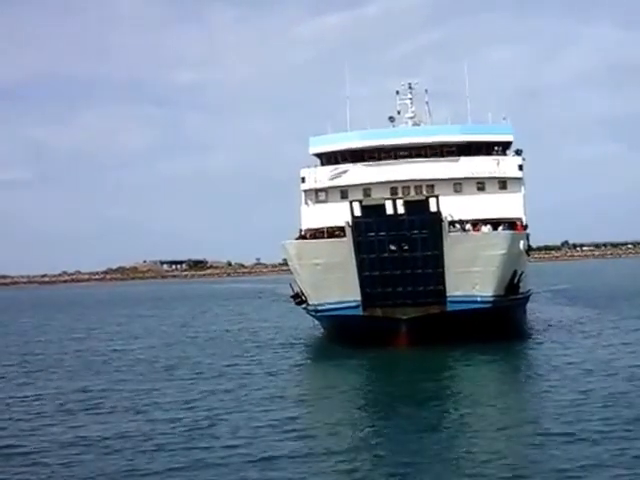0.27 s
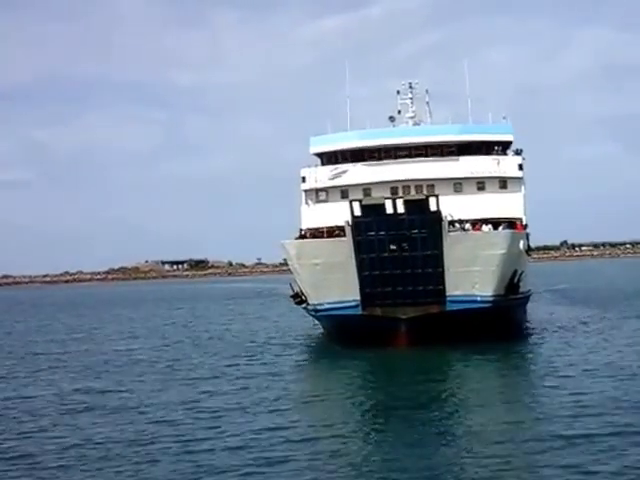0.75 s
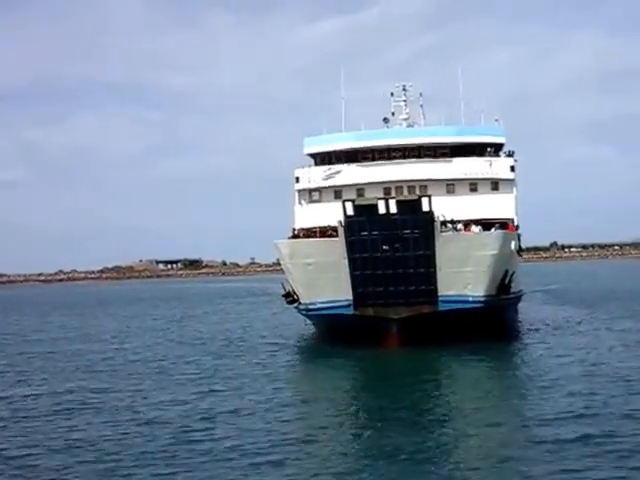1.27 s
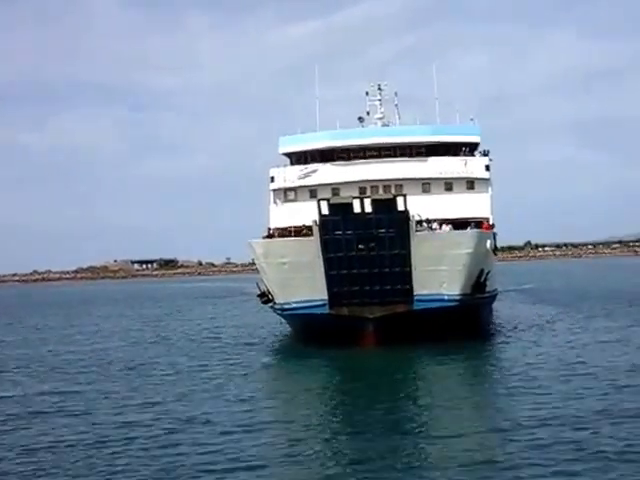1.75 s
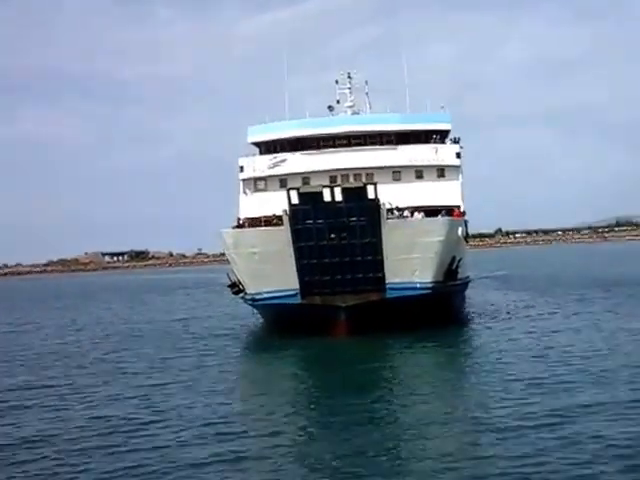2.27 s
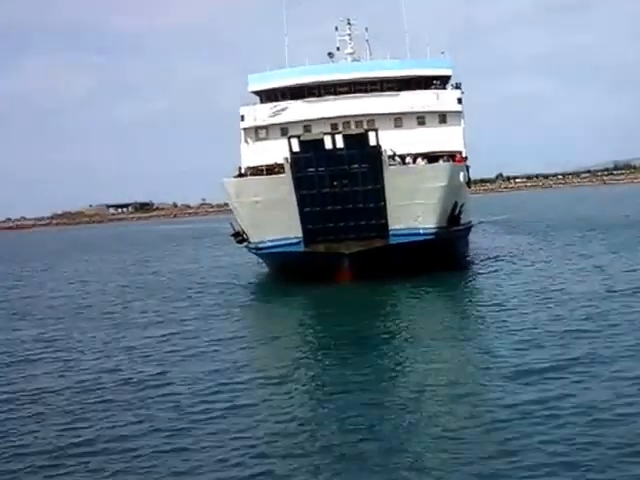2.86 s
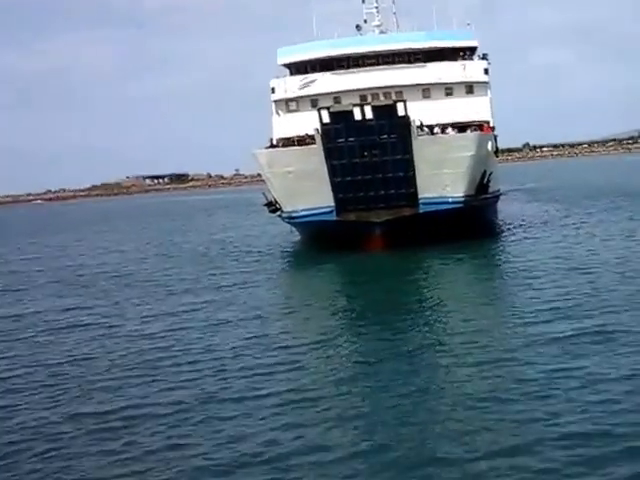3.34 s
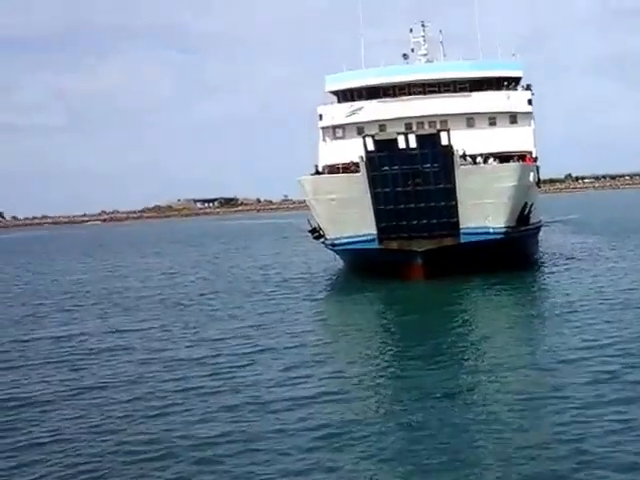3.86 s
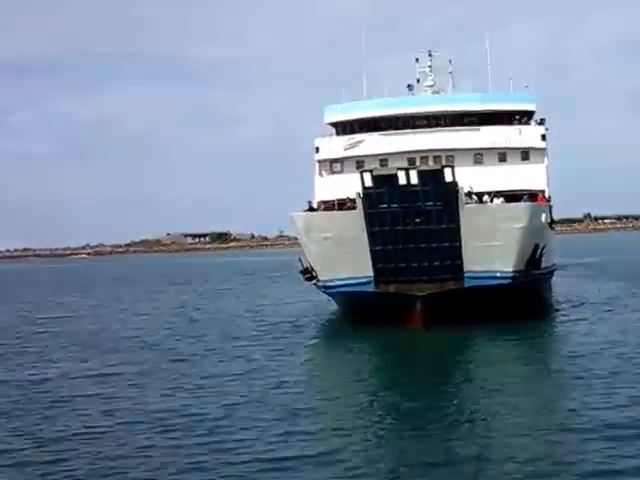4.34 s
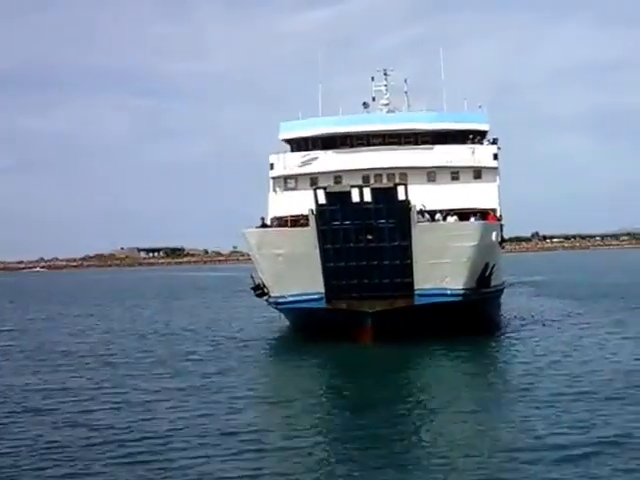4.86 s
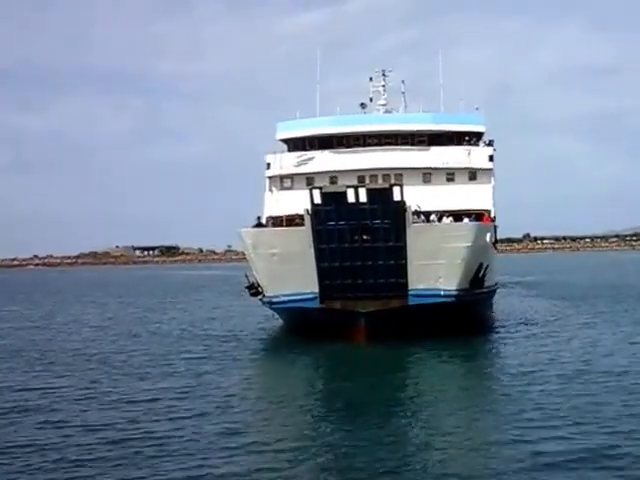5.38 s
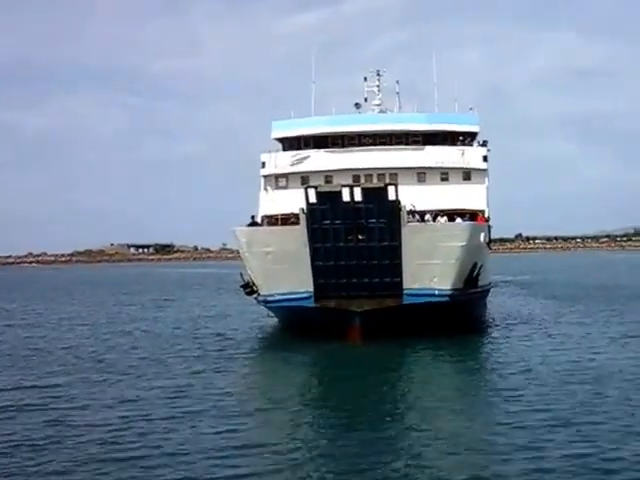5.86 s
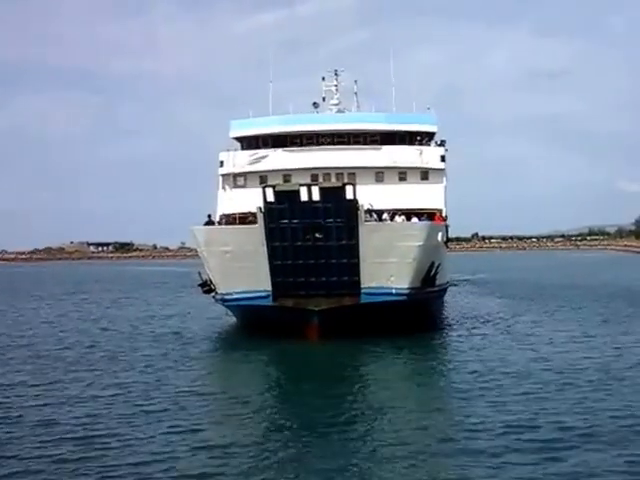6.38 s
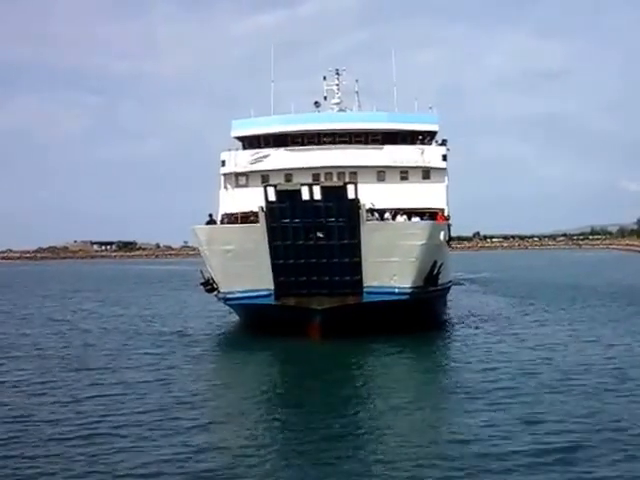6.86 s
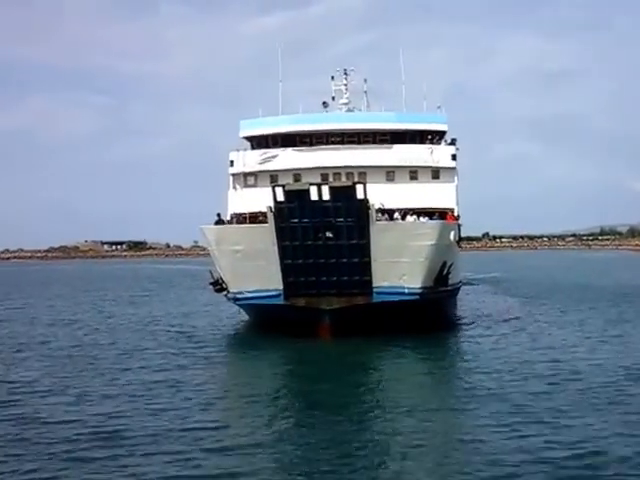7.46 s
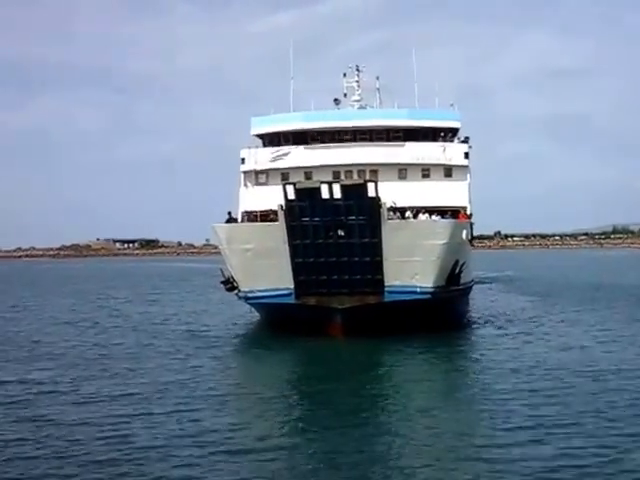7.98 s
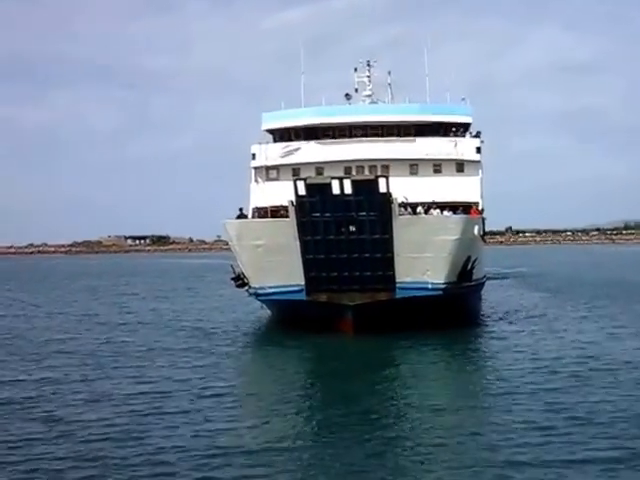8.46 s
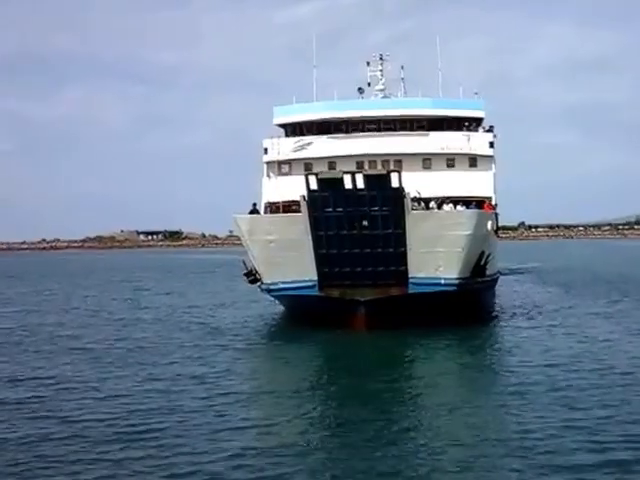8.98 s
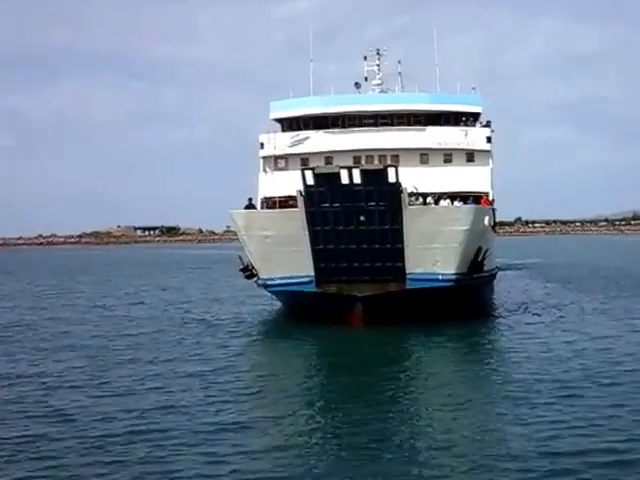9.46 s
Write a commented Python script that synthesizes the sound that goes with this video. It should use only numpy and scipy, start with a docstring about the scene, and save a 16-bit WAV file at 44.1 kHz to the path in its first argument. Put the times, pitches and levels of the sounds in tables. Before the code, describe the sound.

Two steady, blaring ship horn blasts at a harbour, with rumbling wind bursts between and after, soft water hiss and a thin high whistle.

```python
"""A harbour: a ferry's air horn, already sounding at the start, gives two long, bright blasts. The horn is a
sum of harmonics of a pulsed air stream; decaying noise makes the echo of water and quay. Wind, noise in three
bands and sharp pressure jolts, buffets the microphone in gusts, which come through loudest between and after
the blasts. From the second blast on, a thin, wavering whistle of noisy harmonics rises over a soft hiss of
water, which is shaped noise; a small click falls near the end."""
import sys
import numpy as np
from scipy import signal
from scipy.fft import rfft, irfft, next_fast_len
from scipy.io import wavfile

SR = 44100
rng = np.random.default_rng(int(sys.argv[2]) if len(sys.argv) > 2 else 0)


def transcribe(signal):
    """Save signal, clipped to [-1, 1], as a 16-bit WAV file at the path in sys.argv[1]."""
    frames = np.atleast_2d(signal).T
    limited = np.clip(frames, -1, 1)
    pcm = np.round(limited * 32767).astype(np.int16)
    wavfile.write(sys.argv[1], SR, pcm)


N = 429093
TIME = np.arange(N) / SR


def amp(db):
    """Level law: decibels to amplitude gain."""
    return 10 ** (np.asarray(db) / 20)


def unit(x):
    """Normalisation: a signal scaled to rms 1."""
    return x / np.sqrt(np.mean(x ** 2) + 1e-20)


def along(points, hz):
    """Logarithmic frequency scale: (freq_hz, value) points interpolated at hz."""
    f, v = np.transpose(points)
    return np.interp(np.log(hz + 1), np.log(f + 1), v)


def curves(rows, t=TIME):
    """Linear interpolation: each column after the time column, read at the times t."""
    s, *columns = np.transpose(rows)
    return [np.interp(t, s, column) for column in columns]


def wobble(rate, t=TIME):
    """Band-limited randomness: a smooth curve through rate random knots a second, rms about 1."""
    knots = rng.standard_normal(int(N * rate / SR) + 16)
    fine = signal.resample_poly(knots, 8, 1)
    return np.interp(t * rate * 8 + 32, np.arange(len(fine)), fine)


def ripples(count, rate, t, alike):
    """Correlated fluctuation: one random curve per partial, each resembling its neighbour's."""
    rows = [wobble(rate, t) for _ in range(count)]
    return signal.lfilter([np.sqrt(1 - alike ** 2)], [1, -alike], rows, axis=0)


def filtered(x, response):
    """Linear filtering: the spectrum of x times a response of frequency."""
    m = next_fast_len(len(x) + SR // 4)
    return irfft(rfft(x, m) * response(np.fft.rfftfreq(m, 1 / SR)), m)[:len(x)]


def noise(spectrum):
    """Spectral shaping: white noise coloured by (freq_hz, level_db), rms 1."""
    return unit(filtered(rng.standard_normal(N), lambda hz: amp(along(spectrum, hz))))


def below(hz, edge_hz, order):
    """Low-pass law: gain that rolls off smoothly above edge_hz."""
    return 1 / (1 + (hz / edge_hz) ** order)


# valve times of each blast: opens_s, shuts_s
BLAST_VALVES = [(-.2, 2.118), (3.453, 7.675)]
# slow level of each blast in four bands, before the horn's trim:
# time_s, lowest_partials_db (first to third), fourth_partial_db, middle_db, blare_db
BAND_LEVELS = [
    [(0.02, -19.5, -28, -22, -20.5), (0.32, -22, -33.5, -23.5, -22), (0.84, -22.5, -37, -22.5, -20.5),
     (1.31, -21.5, -32, -21, -20.5), (1.45, -23, -33.5, -21.5, -20), (1.81, -20.5, -33, -19, -21.5),
     (2.09, -21, -30, -20.5, -21.5)],
    [(3.52, -28.5, -28.5, -24.5, -18.5), (3.9, -25, -27, -24, -22), (4.19, -28.5, -23.5, -23, -20.5),
     (4.39, -24.5, -24.5, -22, -20.5), (4.73, -27.5, -23, -22.5, -18), (5.3, -26, -34.5, -25, -22.5),
     (6.03, -26, -26, -21.5, -20.5), (6.51, -25.5, -28.5, -22.5, -20), (6.76, -23.5, -27.5, -20.5, -21.5),
     (7.14, -24.5, -28, -21.5, -18.5), (7.23, -27.5, -29, -22, -20), (7.65, -23, -34.5, -20, -22)],
]
# relative partials of each blast, balanced within each band: multiple, level_db
FIRST_PARTIALS = [(1, -21), (2, -17.5), (3, -1), (4, -10.5), (5, -0.5), (6, -0.5), (7, -15.5), (8, -5),
                  (9, -9), (10, -18), (11, -19.5), (12, -12), (13, -16.5), (14, -12.5), (15, -13.5),
                  (16, -14.5), (17, -8), (18, -7.5), (19, -16.5), (20, -7), (21, -5.5), (22, -6)]
SECOND_PARTIALS = [(1, -12.5), (2, -18), (3, 1), (4, -1.5), (5, 1.5), (6, 5), (7, -4.5), (8, -3), (9, -5),
                   (10, -10.5), (11, -11), (12, -17.5), (13, -8), (14, -6), (15, -11), (16, -10), (17, -8),
                   (18, -10), (19, -3), (20, -8.5), (21, 0), (22, -1)]
# the blaring top of the horn, against the last listed partial: freq_hz, level_db
BLARE_SPECTRUM = [(6250, 1), (6550, 2.5), (6850, -2.5), (7400, -8), (8150, -15.5), (9000, -24),
                  (10300, -30.5), (11300, -35.5), (14000, -39)]
PITCH_HZ, CREEP_HZ_PER_S = 270.64, 0.27  # the diaphragm's pitch creeps up the whole time
SHARP_HZ, SETTLE_S = 4.18, 0.0503  # each blast starts sharp and settles with this time constant
# quick beating, full from the tenth partial up, calms down through a blast
FLICKER_START_DB, FLICKER_END_DB = 2.5, 0.67


def blast(valve, band_levels, partials, fade_db=3, rise_s=0.0087, linger_s=0.052, linger_db=-6):
    """Harmonics of a pulsed flow: a diaphragm chops the air; partials fade partly with their neighbours."""
    opens, shuts = valve
    on = (TIME > opens) & (TIME < shuts + .3)
    t = TIME[on]
    pitch = PITCH_HZ + CREEP_HZ_PER_S * t + SHARP_HZ * np.exp(-(t - opens) / SETTLE_S)
    jitter = 0.00048 * wobble(40, t) + 0.000331 * wobble(4, t)
    phase = 2 * np.pi * np.cumsum(pitch * (1 + jitter)) / SR

    multiples, levels = np.transpose(partials)
    k = np.arange(1, 52)
    hz = k * PITCH_HZ
    blare = along(BLARE_SPECTRUM, hz) + levels[-1]
    level = np.where(k <= len(multiples), np.interp(k, multiples, levels), blare)
    band_of = np.digitize(hz, [950, 1200, 4450])

    flicker_db = np.interp(t, valve, [FLICKER_START_DB, FLICKER_END_DB])
    fades = ripples(len(k), 1.7, t, alike=0.43)
    beats = ripples(len(k), 26, t, alike=0.51)
    offsets = rng.standard_normal(len(k))
    # when the valve shuts the direct sound drops at once; what the ship's front reflects lingers
    after = np.maximum(t - shuts, 0)
    release = np.maximum(np.exp(-after / .025), amp(linger_db) * np.exp(-after / linger_s))

    bands, power = np.zeros((4, len(t))), np.zeros((4, len(t)))
    for n, b, db, fade, beat, offset in zip(k, band_of, level, fades, beats, offsets):
        exposure = min(n / 10, 1) ** 2  # short waves are scattered more by turbulence
        gain = amp(db + exposure * fade_db * (1.5 - 1.8 * np.abs(fade)))  # narrow crests, broad dips
        # the pulse sharpens as the pressure builds: high partials enter later
        attack = np.clip((t - opens - 0.00067 * min(n, 30)) / rise_s, 0, 1)
        # the flare smears each pulse; reflections and moving air shift the arrival of each partial
        lag = .04 * n * n + min(n / 6, 1) * .7 * offset + exposure * .4 * fade
        flicker = amp(exposure * flicker_db * beat)
        bands[b] -= gain * flicker * attack * np.cos(n * phase - lag)
        power[b] += gain ** 2 / 2
    out = np.zeros(N)
    out[on] = release * np.sum(amp(curves(band_levels, t)) * bands / np.sqrt(power), axis=0)
    return out


# reverberation time: freq_hz, t60_s
HARBOUR_DECAY = [(300, 0.089), (1200, 0.16), (3000, 0.77), (6000, 0.43), (12000, 0.084)]
# echo against the direct sound: freq_hz, level_db
ECHO_SPECTRUM = [(800, -22), (1700, -17), (3000, -16), (6000, -10.5), (12000, 0)]


def harbour(x):
    """Diffuse reflection: hull, quay and water answer with a short, bright tail, 25 ms late."""
    hz, t, z = signal.stft(rng.standard_normal(SR), SR, nperseg=256)
    decay = amp(-60 * t / along(HARBOUR_DECAY, hz)[:, None])
    tail = signal.istft(z * decay, SR, nperseg=256)[1]
    tail = np.pad(tail, (round(.025 * SR), 0))
    answer = signal.fftconvolve(x, tail / np.linalg.norm(tail))[:N]
    return filtered(answer, lambda hz: amp(along(ECHO_SPECTRUM, hz)))


# hiss before its random swing: time_s, level_db
HISS_LEVEL = [(0, -44), (2.5, -48), (2.9, -42.5), (5.5, -47.5), (8.5, -40.5), (9.1, -45), (9.45, -40.5),
              (9.73, -44.5)]
# relative noise spectrum of water, also used by the click: freq_hz, level_db (per Hz)
WATER_SPECTRUM = [(300, -21), (2000, -1), (3100, -6), (4500, -1.5), (5600, 0), (6650, 5), (7800, -8),
                  (9500, -13.5), (11500, -19), (14000, -25)]


def water():
    """Broadband noise radiation: ripples and air make a soft hiss."""
    return amp(curves(HISS_LEVEL)[0] + 2.1 * wobble(18)) * noise(WATER_SPECTRUM)


BREEZE_DB, BREEZE_BRIGHT_DB = -35.5, -4.5  # rumble and brightness of the wind between gusts
GUST_ATTACK_S, GUST_RELEASE_S = 0.01, 0.075
GUST_SWELL_DB = 0.5  # a gust gains this much over its length
# gusts, before lumps and trims; brightness is flutter against rumble:
# start_s, length_s, rumble_db, brightness_db
WIND_GUSTS = [(0.185, 0.3, -26.5, 0), (0.605, 0.023, -30, -3), (1.934, 0.65, -29, 0.5),
              (2.646, 0.21, -25.5, 3.5), (2.89, 0.25, -21, -0.5), (3.183, 0.322, -23, -3.5),
              (3.725, 0.1, -33.5, 10), (3.98, 0.52, -29, -1.5), (4.624, 0.35, -26.5, -2),
              (5.098, 0.25, -23.5, 1), (5.393, 0.25, -27.5, -2), (5.759, 0.35, -27.5, 0),
              (6.28, 0.37, -24.5, -2), (6.675, 0.35, -30.5, -1.5), (7.157, 0.15, -24, -0.5),
              (7.333, 0.27, -27, -3), (7.704, 0.31, -26, -2), (8.015, 0.42, -19, -5.5),
              (8.444, 0.26, -25, -8), (8.775, 0.24, -20.5, -3), (9.126, 0.21, -24, -3.5),
              (9.362, 0.13, -24, -6), (9.592, 0.16, -22.5, -6)]


def gusting():
    """Addition of powers: gusts rise, swell and die over a steady breeze; strength, brightness in dB."""
    power = np.full(N, amp(BREEZE_DB) ** 2)
    bright = power * BREEZE_BRIGHT_DB
    for start, length, db, bright_db in WIND_GUSTS:
        age = TIME - start
        attack = np.clip(age / GUST_ATTACK_S, 0, 1)
        release = np.clip(1 - (age - length) / GUST_RELEASE_S, 0, 1)
        swell_db = GUST_SWELL_DB * (np.clip(age / length, 0, 1) - .5)
        gust = (attack * release * amp(db + swell_db)) ** 2
        power, bright = power + gust, bright + gust * bright_db
    return 10 * np.log10(power), bright / power


# relative spectrum of wind on the microphone: freq_hz, level_db (per Hz)
WIND_SPECTRUM = [(15, -54), (25, -30.5), (97, -2.5), (205, -1), (407, -4), (534, -7), (652, -10),
                 (811, -12.5), (1010, -16.5), (1590, -27.5), (1900, -36), (2470, -46), (4180, -120)]
# tearing edge against the untrimmed flutter; dB more for each dB of brightness
TEAR_DB, TEAR_PER_BRIGHT = -10, 0.76


def wind(rumble_swing_db=3.0, flutter_swing_db=4, tear_swing_db=8.0, split_hz=280, edge_hz=760,
         lump_db=1.4, bright_lump_db=2.5):
    """Turbulent pressure: eddies cross the microphone; three noise bands follow their strength."""
    strength_db, bright_db = gusting()
    lumps = np.tanh(1.6 * wobble(24)) - 0.3  # eddies come in clusters, with lulls between
    rumble_db = strength_db + lump_db * lumps
    flutter_db = rumble_db + bright_db + bright_lump_db * lumps
    tear_db = flutter_db + TEAR_DB + TEAR_PER_BRIGHT * bright_db
    eddy = 2.28 * np.tanh((1.36 * wobble(260) + 0.57 * wobble(45)) / 2.07)
    air = rng.standard_normal(N)

    def band(swing_db, share):
        """Amplitude modulation: the same air swung by the eddies, limited to one band, rms 1."""
        swung = air * amp(swing_db * eddy)
        return unit(filtered(swung, lambda hz: amp(along(WIND_SPECTRUM, hz)) * share(hz)))

    rumble = band(rumble_swing_db, lambda hz: below(hz, split_hz, 4))
    flutter = band(flutter_swing_db, lambda hz: (1 - below(hz, split_hz, 4)) * below(hz, edge_hz, 6))
    tear = band(tear_swing_db, lambda hz: 1 - below(hz, edge_hz, 6))
    return amp(rumble_db) * rumble + amp(flutter_db - 2.5) * flutter + amp(tear_db) * tear


# the hardest eddies, before trim and high-pass; a higher edge makes a narrower jolt:
# start_s, peak_db, tearing_edge_db
EDDY_PUFFS = [(0.215, -11, -36), (0.246, -14, -15), (0.429, -15, -9), (2.375, -14, -30),
              (2.693, -15.5, -16), (2.759, -6, -24.5), (2.832, -11, -20), (3.227, -9, -38),
              (3.372, -6.5, -29), (3.785, -10, -29), (4.943, -14, -19), (5.294, -10, -13), (5.349, -8, -9),
              (6.453, -12, -15), (7.227, -14, -10), (8.083, -8, -37), (8.156, -9, -35), (8.788, -8.5, -30),
              (8.995, -3, -50), (9.162, -9, -35), (9.21, -5.5, -24.5), (9.31, -7.5, -31), (9.493, -7, -36),
              (9.526, -7.5, -32), (9.648, -6.5, -32.5)]


def puffs(width_s=0.00025, puff_db=-1, spacing_s=.0035, follow_db=-6, low_hz=120):
    """Pulse width and bandwidth: a jolt and two weaker ones; the narrower, the higher it tears."""
    out, t = np.zeros(N + SR), np.arange(SR // 20) / SR - .005
    chance = rng.uniform(-0.92, 1, (len(EDDY_PUFFS), 3))
    for (s, db, edge_db), draws in zip(EDDY_PUFFS, chance):
        span = width_s * amp(-.4 * (edge_db + 23.5))
        place = out[round((s + t[0]) * SR):][:len(t)]
        for n, draw in enumerate(draws):
            centre = .0015 + n * spacing_s * (1 + .4 * draw)
            u = np.clip((t - centre) / span, -30, 30)
            jolt = 2 * np.tanh(u) / np.cosh(u)  # a two-sided swing of peak 1
            place += np.sign(draw) * amp(db + puff_db + n * follow_db) * jolt
    return filtered(out[:N], lambda hz: 1 - below(hz, low_hz, order=3))


# relative partials of the whistle; airiness is its noise share before smearing:
# multiple, level_db, airiness
WHISTLE_PARTIALS = [(1, -20.5, 1.1), (2, 4, 0.81), (3, -5.5, 1.2), (4, -18, 0.64), (5, -32, 1.2),
                    (6, -38, .5)]
# whistle before waver and surge loss: time_s, level_db
WHISTLE_CURVE = [(3.5, -64.5), (4.7, -36.5), (5.9, -33.5), (6.6, -43), (7.3, -33), (9.73, -32.5)]
# the whistle is pushed sharp: start_s, length_s, peak_push_hz
WHISTLE_SURGES = [(8.278, 0.42, 45.4), (9.248, 0.091, 85), (9.475, 0.11, 59.7)]
WHISTLE_HZ = 2155  # resting pitch
UNSTEADY, SMEAR_HZ = 0.00412, 70  # pitch unsteadiness at rest, as a share; the push that doubles it
SURGE_LOSS_DB = 1  # a surge that doubles the unsteadiness weakens the whistle by this much


def whistle(swing_db=2.5, air_rate=80, rest_smear=0.8, waver_hz=9, waver_db=0.9):
    """Narrow-band noise around harmonics: strongest in the second; it smears as it is pushed sharp."""
    push_hz = sum(hz * np.sin(np.pi * np.clip((TIME - start) / length, 0, 1))
                  for start, length, hz in WHISTLE_SURGES)
    rough = 1 + push_hz / SMEAR_HZ
    pitch = WHISTLE_HZ + push_hz + waver_hz * wobble(14)
    smear = rest_smear * rough
    phase = 2 * np.pi * np.cumsum(pitch * (1 + UNSTEADY * rough * wobble(500))) / SR
    tone = np.zeros(N)
    for k, level, airiness in WHISTLE_PARTIALS:
        order = round(k)
        rate = air_rate * (order + 1)
        halo = airiness * smear * (wobble(rate) + 1j * wobble(rate)) / np.sqrt(2)
        partial = ((1 + halo) * np.exp(1j * order * phase)).real
        partial /= np.sqrt(1 + (airiness * smear) ** 2)  # keeps the power of tone plus halo
        overblown = smear ** (order % 2)  # the odd partials come up as it smears
        tone += amp(level + swing_db * wobble(60)) * overblown * partial
    level_db = curves(WHISTLE_CURVE)[0] - SURGE_LOSS_DB * (rough - 1) + waver_db * wobble(16)
    return amp(level_db) * unit(tone)


# a small click close by, before a 4 dB cut: start_s, level_db
CLICKS = [(9.5333, -19.5)]


def ticks(t60_s=0.035):
    """Exponential decay: a dry click is a short burst of noise that dies at once."""
    out, t = np.zeros(N + SR), np.arange(SR // 20) / SR
    for s, db in CLICKS:
        burst = noise(WATER_SPECTRUM)[:len(t)]
        out[round(s * SR):][:len(t)] += amp(db - 4 - 60 * t / t60_s) * burst
    return out[:N]


def scene():
    """Superposition: the horn and its echo, with water, wind, whistle and click around the listener."""
    first = blast(BLAST_VALVES[0], BAND_LEVELS[0], FIRST_PARTIALS)
    second = blast(BLAST_VALVES[1], BAND_LEVELS[1], SECOND_PARTIALS)
    horn = amp(-0.14) * (first + second)
    return (horn + harbour(horn) + water() + wind() + puffs() + whistle() + ticks())[None]


TOP_HZ = 13930


def record(dry):
    """Band limiting: nothing passes from TOP_HZ up."""
    return filtered(dry[0], lambda hz: hz < TOP_HZ)[None]


dry = scene()
out = record(dry)
transcribe(out)
```